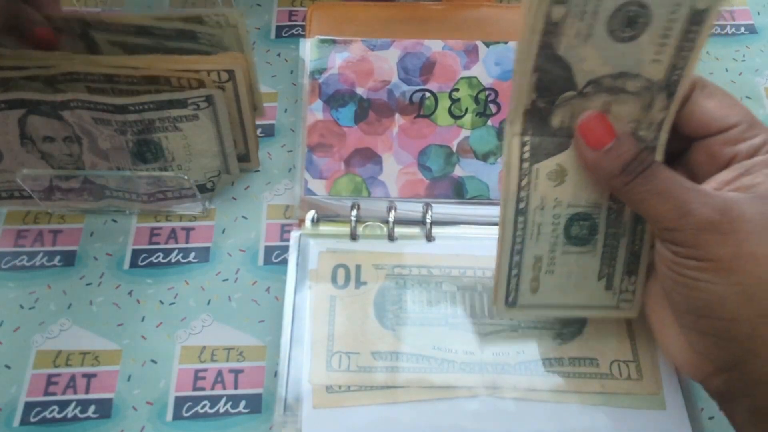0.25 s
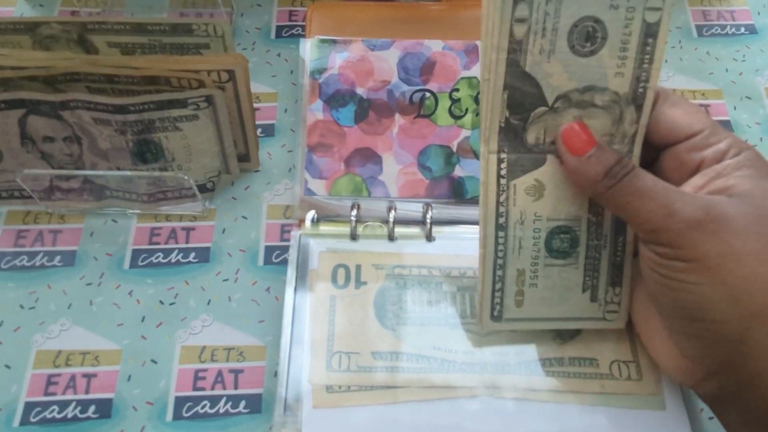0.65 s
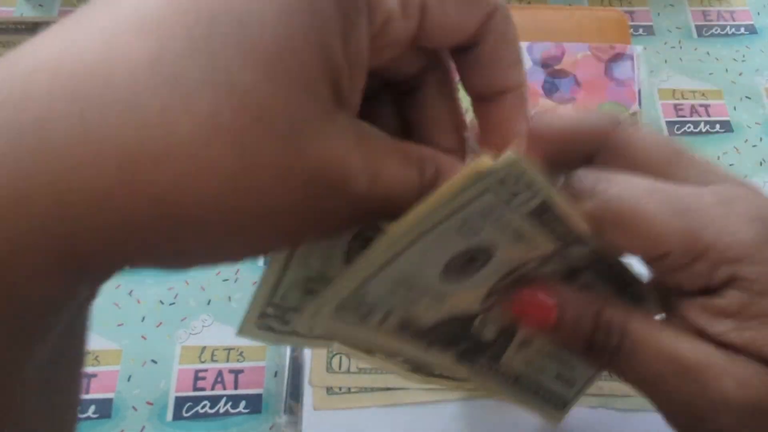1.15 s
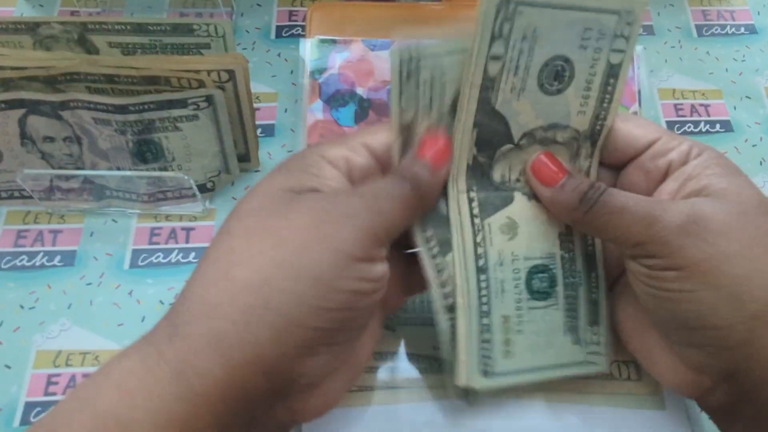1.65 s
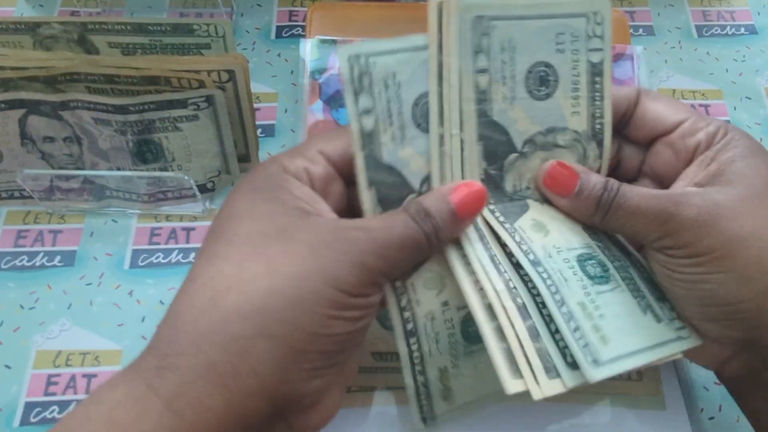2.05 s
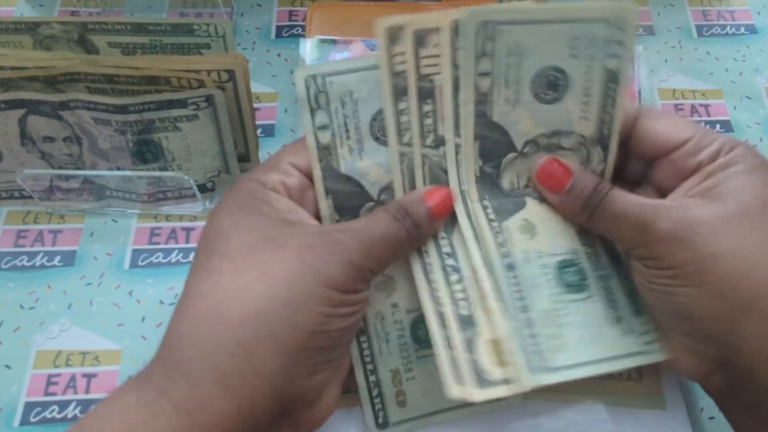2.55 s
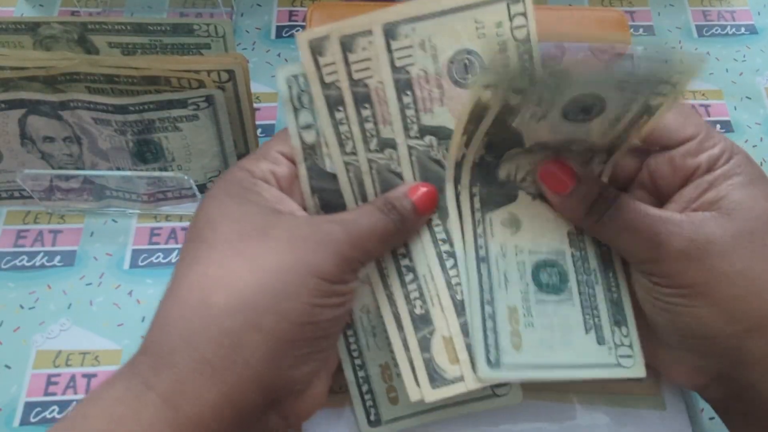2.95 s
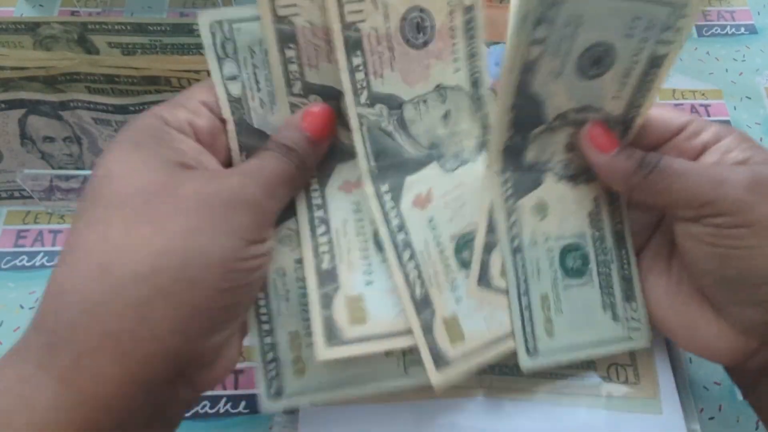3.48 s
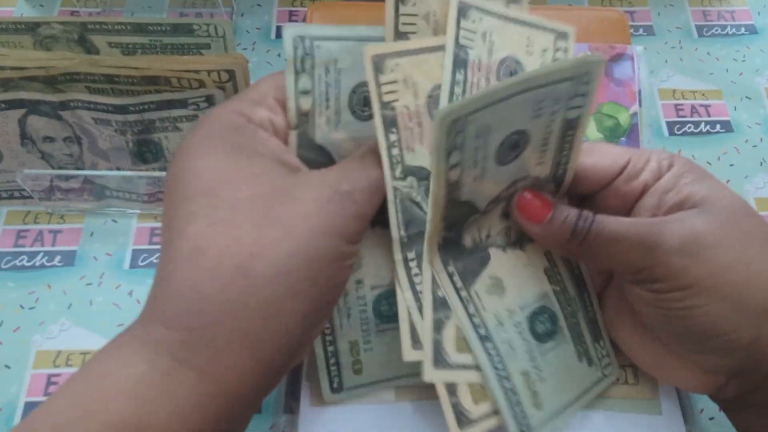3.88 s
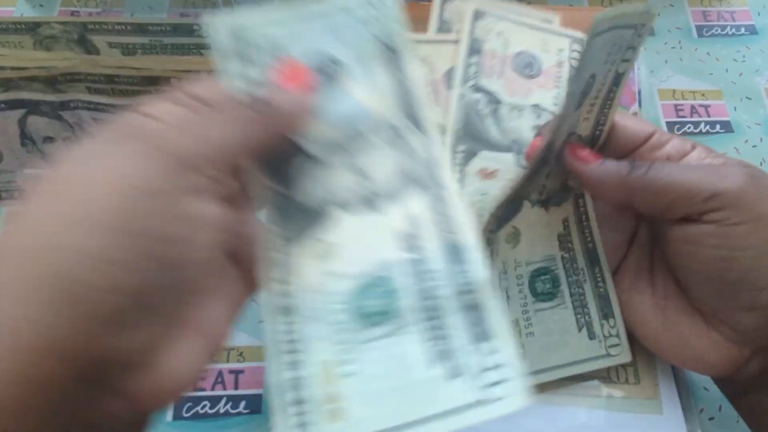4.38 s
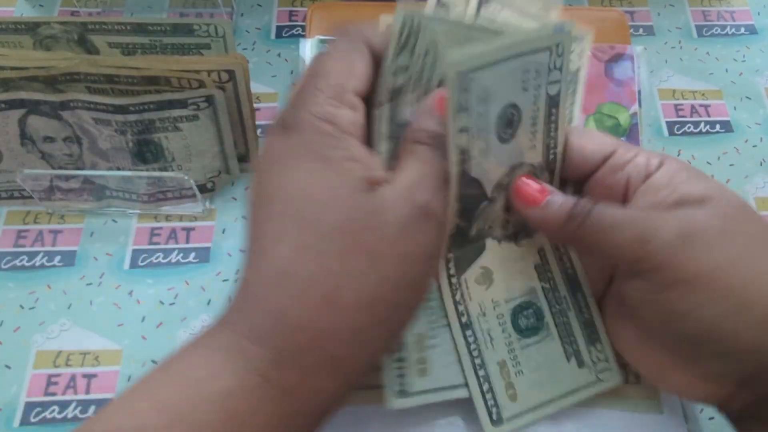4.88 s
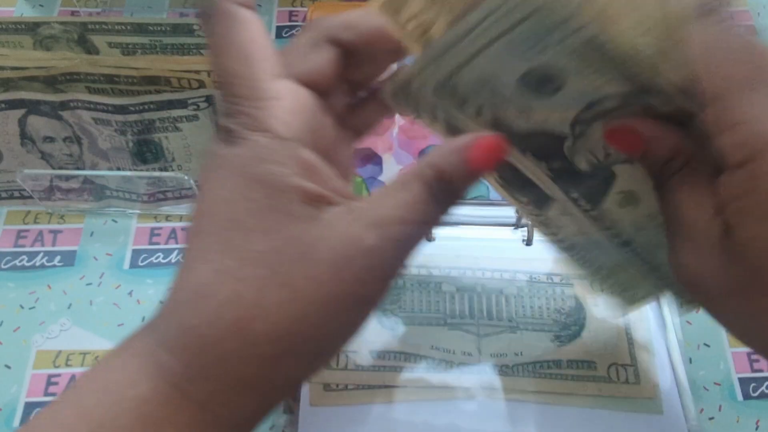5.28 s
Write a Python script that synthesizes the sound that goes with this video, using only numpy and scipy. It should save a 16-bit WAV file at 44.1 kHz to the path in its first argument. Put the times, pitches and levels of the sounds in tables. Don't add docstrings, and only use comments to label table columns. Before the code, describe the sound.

Dry banknotes rustle in short grainy strokes with small gaps. Light fingertip taps, buckling folds, tiny ticks and low puffs of air punctuate the hiss. The sharpest snaps come past the middle and late, as notes are flicked and pulled. Close, wide stereo pickup, slight desk reflections, little reverberation, and a low quiet room hum beneath faint hiss.

```python
import sys
import numpy as np
from scipy import signal
from scipy.fft import rfft, irfft, next_fast_len
from scipy.io import wavfile
from scipy.ndimage import uniform_filter1d, map_coordinates

SR = 44100
rng = np.random.default_rng(int(sys.argv[2]) if len(sys.argv) > 2 else 0)


def unload_audio(sound):
    columns = np.transpose(np.atleast_2d(sound))
    steps = np.round(np.clip(columns, -1, 1) * 32767)
    wavfile.write(sys.argv[1], SR, steps.astype(np.int16))


def how_loud(loudness_db):
    steps = np.asarray(loudness_db, float) / 20
    return 10 ** steps


N = 243917
CONTROL_STEP = 32

# freq_hz, level_db_per_hz
ROOM_TONE = [(35, -25), (60, 2), (219, -18.5), (289, -10.5), (633, -12), (938, -13), (1210, -22),
             (2200, -34), (15000, -46)]
# freq_hz, t60_s
ROOM_DECAY = [(100, 0.15), (1000, 0.31), (4000, 0.45), (12000, 0.33)]
# delay_ms, level_db
ECHOES = [(.9, -20.5), (1.7, -37.5), (2.9, -46), (4.6, -32), (7.3, -18.5), (11, -33)]
# time_s, left_lead_ms, left_over_right_db
HAND_PATH = [(0, .29, -0.5), (.5, .3, 1), (1.2, 0.16, 0), (1.8, 0.066, -1.5), (2.2, .09, -1),
             (2.8, 0.034, -1.1), (3.15, 0.069, -.5), (3.5, 0.081, -.5), (3.7, 0.11, .8), (4.1, 0.13, -.5),
             (4.7, 0.097, -0.1), (5.3, .0078, -1.4)]
# freq_hz, likeness_0_to_1
LIKENESS = [(100, 0.93), (600, 1), (1500, 0.51), (3000, 0.048), (7000, 0.049), (15000, 0.041)]
# freq_hz, width_hz, level_db
DESK_GAP = [(448, 32, 26.5), (1120, 480, 17.5), (1840, 170, 16.5), (2526, 450, 22), (3000, 130, -11)]

# start_s, peak_db, pitch_hz
PUFFS = [(0.879, -38, 450), (0.736, -35.5, 141), (0.877, -42.5, 314), (1.002, -36.5, 165),
         (1.199, -49, 243), (1.348, -44, 80), (1.488, -42, 173), (1.832, -45, 114), (2.026, -53, 119),
         (2.459, -34.5, 382), (5.261, -48, 54.6), (3.059, -47.5, 303), (3.141, -44, 130), (3.208, -49, 350),
         (3.345, -50.5, 135), (3.546, -60, 121), (3.704, -31, 108), (3.706, -31, 280), (3.983, -52, 101),
         (4.21, -52, 127), (4.764, -46.5, 79), (4.993, -47, 360), (4.995, -46.5, 132), (5.07, -48, 103),
         (5.242, -38.5, 163), (5.251, -43, 410), (5.417, -48, 154)]
# start_s, length_s, level_db, pitch_hz
POCKETS = [(0.332, 0.1, -66, 1920), (0.374, 0.029, -58, 3770), (0.439, 0.042, -61.5, 3370),
           (0.474, 0.077, -60, 2270), (0.607, 0.027, -70, 4970), (1.12, 0.021, -55.5, 5400),
           (1.336, .04, -55, 8000), (1.348, 0.035, -51.5, 6160), (2.342, 0.047, -57.5, 2170),
           (2.44, .03, -66, 8000), (3.671, .012, -44, 11500), (3.545, .02, -56, 6070),
           (3.703, 0.012, -35.5, 11900), (3.706, 0.018, -35, 4770), (3.866, 0.056, -55.5, 2220),
           (4.032, 0.083, -56, 6300), (4.351, 0.035, -59, 4300), (4.353, 0.036, -60, 3400),
           (4.709, 0.018, -40, 2500), (4.718, 0.017, -41, 2770), (4.721, 0.027, -45, 4320),
           (4.725, 0.023, -44, 8300), (4.728, 0.012, -50, 1710), (4.707, .03, -47, 6700),
           (5.083, 0.04, -62, 8200), (5.125, 0.065, -55, 5230)]
POCKET_WIDTH = 0.1
# start_s, length_s, level_db, tilt_db
SCRAPES = [(0.738, 0.007, -45.5, -8.5), (1.004, 0.035, -64, -3), (1.348, 0.024, -52, -5),
           (1.486, 0.0058, -38, 6), (1.496, 0.0074, -38.5, 2), (1.506, 0.019, -45, 6), (2.45, 0.02, -60, 8),
           (2.813, 0.003, -36.5, -1), (2.825, 0.01, -51, 9), (3.666, 0.017, -46.5, 7),
           (3.702, 0.01, -32.5, -2.5), (3.704, 0.016, -32, 3), (3.726, 0.025, -48, 0),
           (4.36, 0.041, -58.5, 1.5), (4.486, 0.014, -64, 10), (4.685, 0.014, -40, 4),
           (4.703, 0.022, -37, 5), (4.723, 0.022, -39.5, 7), (4.743, 0.022, -53, 2), (5.11, 0.04, -50, 9)]

# start_s, peak_db, crack_db, knock_db
TAPS = [(.066, -59.5, 3, 20), (.108, -67, 9, -4), (0.798, -48.5, -30, 7), (1.011, -49, -17, -10),
        (1.203, -58, -3, 7), (1.219, -53.5, 7.5, 12), (1.25, -45.5, 4, 21), (1.282, -40.5, -18, 6.5),
        (1.3, -49, -18, -4), (1.372, -46, -13, -4), (1.658, -56.5, -8, 11), (1.836, -46.5, -13, 12.5),
        (2.687, -54.5, -8, -4), (3.063, -67, -8, 0), (3.216, -44, -18, 10), (3.667, -44.5, -6, 3),
        (3.805, -52, -15, 2), (4.004, -50, -17, 2), (4.251, -47.5, -23, -14), (4.272, -55, -16, -4),
        (4.321, -48, -24, 3), (4.47, -53, -17, -3), (4.609, -61.5, -29, -11.5), (4.626, -55, -8, 3.5),
        (4.83, -55.5, 13.5, 16), (5.024, -52, -22, 15), (5.202, -46, -22, -12), (5.429, -47.5, -29, 6)]
TAP_HZ, TAP_T60_S = 457, 0.028
# start_s, peak_db, pitch_hz, knock_db
BUCKLES = [(0.121, -43, 3600, 4), (0.319, -43.5, 1290, -6), (.492, -54, 2280, -13),
           (0.651, -48.5, 1070, -7), (.690, -47, 880, 16), (.743, -37.5, 2600, 10.5),
           (0.885, -33, 880, 11.5), (.910, -35.5, 1140, 9), (.913, -31, 1130, 0), (1.004, -40, 1070, 13.5),
           (1.018, -32.5, 1340, -24), (1.558, -45, 1850, -6), (1.737, -40.5, 700, 10),
           (2.469, -30, 1130, 4), (2.578, -40.5, 1200, -25), (2.855, -43.5, 1140, -11),
           (2.909, -46, 1220, -9), (3.153, -41.5, 1060, 2), (3.479, -43, 1380, -6),
           (3.717, -27, 1210, -1.5), (4.025, -36, 1250, 7), (4.224, -33, 1270, 0), (4.683, -40, 3870, -4),
           (4.691, -23, 3760, -10), (4.71, -36, 2600, -14), (5.073, -30.5, 1320, -9),
           (5.312, -41.5, 1140, -18)]
BUCKLE_CRACK_DB, BUCKLE_T60_S = -21, 0.023
# start_s, peak_db, pitch_hz, crack_db
CRACKS = [(0.038, -46.5, 1670, -11), (0.225, -52, 1370, 6), (0.99, -50.5, 2390, 12.5), (1.13, -49, 1870, 0),
          (1.324, -39, 1750, -4), (1.358, -39, 1050, -7), (1.487, -35, 2580, -9), (1.498, -31, 2430, -1.5),
          (1.518, -44, 1990, -3), (1.941, -43, 1250, -8), (2.267, -50, 1450, 4), (2.82, -25, 1700, 0.5),
          (2.941, -36.5, 1770, -4), (3.094, -53, 910, -9.5), (3.191, -45, 1120, -12),
          (3.261, -45, 930, -17), (3.605, -53, 1010, -14), (3.704, -29.5, 1920, 13),
          (3.712, -35, 1970, -15), (4.223, -51, 2620, -18), (4.879, -52, 990, 10.5), (4.956, -52, 1200, 7),
          (5.117, -47, 1060, -10), (5.133, -51, 980, -2), (5.154, -44, 1340, -14), (5.178, -37.5, 1150, -6),
          (5.249, -31, 1570, -12), (5.298, -42.5, 1640, -18), (5.515, -48, 1450, -12)]
CRACK_KNOCK_DB, CRACK_T60_S = -8.5, 0.017
# start_s, peak_db, pitch_hz, crack_db
TICKS = [(0.682, -42, 2500, -16), (0.719, -41, 3000, -14), (0.736, -44, 4500, -11), (.786, -49, 2500, -13),
         (1.005, -35, 9900, -5), (1.113, -36.5, 3300, -17), (1.298, -33.5, 4370, -18),
         (1.317, -56, 1090, -14), (1.372, -49, 2200, -13), (1.522, -30.5, 5130, -7),
         (1.558, -34.5, 3000, -18), (1.658, -50, 2000, -8), (1.737, -32.5, 1550, -17),
         (1.76, -44, 1500, -8), (1.786, -35, 3400, -8), (1.948, -43, 2400, -5), (2.267, -30, 12000, -12),
         (2.273, -41, 9100, -1), (2.469, -27.5, 3950, -23), (2.577, -27, 11200, -22),
         (2.82, -31.5, 1010, -13), (3.077, -53, 2470, -2), (3.668, -40, 4500, -6), (3.708, -22, 4500, -8),
         (3.7075, -18.5, 6960, -12), (4.038, -48, 9000, 3), (4.223, -35, 3000, -25),
         (4.679, -52, 1510, -20), (4.955, -43, 2580, -16), (4.979, -44.5, 2500, -9),
         (5.039, -54, 1500, -10), (5.089, -56, 1500, -12), (5.118, -41, 1300, -15.5),
         (5.132, -39, 6000, -1), (5.247, -33, 2300, -11), (4.064, -42, 716, -20), (0.884, -34, 2190, -25),
         (0.744, -41, 1120, -15), (3.903, -41, 1310, -16), (1.503, -46, 1010, -16),
         (1.518, -44.5, 780, -18), (2.48, -44, 1250, -18), (2.497, -45, 1300, -18), (0.857, -55, 1190, -18),
         (3.721, -30, 1300, -16), (3.735, -44, 8500, -8),
         (1.846, -42, 1600, -16), (1.907, -50, 4500, -8), (2.082, -51, 2260, -20),
          (2.822, -30.5, 1180, -20), (3.107, -47, 1900, -14), (3.181, -45, 1800, -20),
          (3.217, -47, 1500, -14), (3.354, -55, 600, -20), (4.687, -39, 5000, -10), (4.769, -49, 640, -18),
          (5.025, -39, 2520, -14), (5.204, -42.5, 915, -18)]
TICK_KNOCK_DB, TICK_T60_S = -13.5, 0.0075

# freq_hz, level_db_per_hz
PUSH_SPECTRUM = [(15, -42.5), (25, -6), (48, 5.5), (109, 4.5), (205, -4), (263, -4), (330, -5.5),
                 (430, -40), (730, -120)]
# time_s, effort_db
ARM_EFFORT = [(0.0, -67.5), (0.14, -75.5), (0.44, -73.5), (0.86, -70), (1.89, -68), (2.08, -75),
              (2.53, -69.5), (2.69, -71), (2.93, -72.5), (3.09, -73), (3.57, -74), (3.8, -67), (3.9, -69),
              (4.21, -71.5), (4.47, -74), (5.11, -67), (5.34, -67), (5.53, -68)]
PUSH_DB, PUSH_FOLLOWS, PUSH_SMOOTH_S, PUSH_WANDER_DB = 3, 0.18, 0.092, 0.7

# freq_hz, level_db_per_hz
HISS_SPECTRUM = [(880, -38.5), (1500, -19), (1850, -1.5), (2120, -38), (2750, -6), (3710, -8.5), (7350, -8),
                 (8180, -7), (9720, -12), (11900, -7.5), (15000, -11)]
# freq_hz, level_db_per_hz
BODY_SPECTRUM = [(120, -59), (200, -5), (269, -4.5), (443, -8), (845, -4), (1220, -2.5), (3570, -12),
                 (5000, -2.5), (6500, -3.5), (11000, -120)]
# start_s, length_s, hiss_db,
# swell_db, body_over_hiss_db
RUB_STROKES = [(0, 0.0065, -60.5, -6, 2), (0.067, 0.13, -77, -6, 8.5), (0.222, 0.18, -59.5, 1, -0.5),
               (0.435, 0.05, -73, 2.5, 11), (0.513, 0.043, -58, 5.5, -4.5), (0.592, 0.02, -56, 4.5, -3.5),
               (0.65, 0.044, -66.5, -1.5, 8), (0.7, 0.055, -56.5, 8.5, 2.5), (0.841, 0.085, -60.5, 2.5, -1),
               (0.983, 0.018, -51, 0, -15), (1.007, 0.022, -52, -7, 2.5), (1.034, 0.041, -62, 1, 2),
               (1.125, 0.013, -60, -3, 4.5), (1.189, 0.044, -62, 0, 0.5), (1.251, 0.12, -51.5, 7, -3),
               (1.408, 0.068, -58, 9.5, -8), (1.533, 0.057, -60, -2.5, -2), (1.614, 0.071, -57.5, -2, -7.5),
               (1.707, 0.13, -52.5, 4, -2), (1.855, 0.038, -64, 6, -1), (1.947, 0.023, -56, -13.5, -1),
               (1.974, 0.13, -65.5, -7, -3.5), (2.119, 0.098, -60.5, -5.5, 1), (2.237, 0.1, -57.5, 1.5, 0),
               (2.383, 0.043, -55.5, 6, -1), (2.445, 0.032, -52.5, 2.5, -0.5), (2.505, 0.11, -60, 1.5, 1.5),
               (2.632, 0.25, -60.5, 5, -1.5),
               (2.835, 0.18, -63.5, -4, 1.5), (3.09, 0.038, -53, 2.5, -1.5), (3.155, 0.046, -55.5, 3, 1),
           (3.215, 0.023, -50.5, 0, -6), (3.25, 0.018, -61, 4, 4), (3.28, 0.21, -58.5, 2.5, -1.5),
           (3.48, 0.082, -56, 11.5, -3.5), (3.61, 0.13, -51, 9.5, 0), (3.74, .11, -57.5, -1, -2),
           (3.868, 0.045, -54.5, 2, 3), (3.935, 0.064, -58, 0, 2.5), (4.02, 0.16, -54, 1.5, -1),
           (4.21, 0.087, -70.5, 6, 1.5), (4.305, 0.017, -58.5, 5, -6), (4.345, 0.052, -59, -2, -5.5),
           (4.415, 0.033, -71.5, -9, 4.5), (4.46, 0.039, -68, 3.5, 8.5), (4.759, 0.084, -60, 0, -0.5),
           (4.873, 0.16, -56, 7, -0.5), (5.05, 0.081, -50.5, 7.5, 0), (5.145, 0.059, -52, -5, -7),
           (5.21, 0.033, -55.5, 10, 1.5), (5.28, 0.13, -62, 10.5, 3), (5.44, 0.18, -72.5, -9, 9)]
START_DB_PER_S, STOP_DB_PER_S, BODY_STOP_DB_PER_S = 697, 439, 258
SETTLE_DB, SETTLE_DB_PER_S = -33, 62
REST_HISS_DB, REST_BODY_DB = -85, -73.5


def unit(x):
    return x / np.sqrt(np.mean(x ** 2) + 1e-20)


def along(points, hz):
    f, v = np.transpose(points)
    return np.interp(np.log(hz + 1), np.log(f + 1), v)


def curves(rows):
    s, *cols = np.transpose(rows)
    return [np.interp(np.arange(N) / SR, s, c) for c in cols]


def smooth(control):
    return np.interp(np.arange(N), np.arange(len(control)) * CONTROL_STEP, control)


def wobble(rate_hz):
    knots = rng.standard_normal(int(N * rate_hz / SR) + 4)
    fine = map_coordinates(knots, [np.arange(len(knots) * 8) / 8])
    return np.interp(np.arange(N) * rate_hz / SR, np.arange(len(fine)) / 8, fine)


def filtered(x, response):
    m = next_fast_len(x.shape[-1] + 2048, True)
    spectrum = rfft(x, m) * response(np.fft.rfftfreq(m, 1 / SR))
    return irfft(spectrum, m)[..., :x.shape[-1]]


def resonance(f, hz, width_hz):
    return 1j * f * width_hz / (hz * hz - f * f + 1j * f * width_hz)


def gap(f, open_db):
    ringing = sum(how_loud(db) * np.abs(resonance(f, hz, width_hz)) for hz, width_hz, db in DESK_GAP)
    return how_loud(open_db) + ringing


def spread(shared, own):
    def turn(hz):
        return np.arccos(np.clip(along(LIKENESS, hz), 0, 1)) / 2

    pair = np.array([shared, own])
    mid, side = filtered(pair, lambda hz: np.array([np.cos(turn(hz)), np.sin(turn(hz))]))
    return np.array([mid + side, mid - side])


def friction(grain_db, clump_db, patch_db):
    z = signal.stft(rng.standard_normal((2, N)), nperseg=512)[2]
    field = uniform_filter1d(rng.standard_normal(z.shape[1:]), size=7, axis=0)
    field = uniform_filter1d(field, size=9, axis=1)
    noise = signal.istft(z * how_loud(patch_db * unit(field)), nperseg=512)[1][:, :N]
    size_db = grain_db * wobble(900) + clump_db * (wobble(120) + wobble(35))
    return spread(*(noise * how_loud(size_db)))


def crackle(rate_hz, spread_db):
    hit = rng.random(N) < rate_hz / SR
    size = np.minimum(rng.exponential(size=N), 2.5)
    return spread(*(hit * how_loud(spread_db * size) * rng.standard_normal((2, N))))


def room_tone():
    return how_loud(-72.5) * unit(filtered(rng.standard_normal((2, N)), lambda f: how_loud(along(ROOM_TONE, f))))


def room(x):
    hz, t, z = signal.stft(rng.standard_normal((2, SR // 3)), SR, nperseg=256)
    decay = how_loud(-60 * t / along(ROOM_DECAY, hz)[:, None])
    tail = signal.istft(z * decay, SR, nperseg=256)[1]
    delayed = np.pad(x, ((0, 0), (220, 0)))
    return signal.fftconvolve(delayed, tail / np.linalg.norm(tail[0]), axes=1)[:, :N]


def nearby(x):
    skew = np.array([[1.07], [.93]])

    def returns(f):
        return 1 + sum(how_loud(db) * np.exp(-2j * np.pi * f * ms * skew / 1000) for ms, db in ECHOES)

    return filtered(x, returns)


def placed(x):
    lead_ms, pan_db = curves(HAND_PATH)
    lead = lead_ms * SR / 2000
    n = np.arange(N)
    left = map_coordinates(x[0], [n + lead], order=3)
    right = map_coordinates(x[1], [n - lead], order=3)
    return np.array([left * how_loud(pan_db / 2), right * how_loud(-pan_db / 2)])


def puffs():
    out, t = np.zeros(N + SR), np.arange(SR // 5) / SR
    for s, db, hz in PUFFS:
        swell = rng.standard_normal(len(t)) * t * how_loud(-60 * t / 0.056)
        push = filtered(swell, lambda f: resonance(f, hz, 1.0 * hz) ** 2)
        out[round(s * SR):][:len(t)] += how_loud(db - 6.5) * push / np.abs(push).max()
    return out[:N]


def hand_push():
    body_db = strokes()[1]
    thump = filtered(friction(grain_db=.1, clump_db=.9, patch_db=1.2), lambda f: how_loud(along(PUSH_SPECTRUM, f)))
    motion_db = uniform_filter1d(body_db, size=round(PUSH_SMOOTH_S * SR))
    follow_db = PUSH_FOLLOWS * (motion_db - motion_db.mean())
    push_db = PUSH_DB + curves(ARM_EFFORT)[0] + follow_db + PUSH_WANDER_DB * wobble(9.9)
    return how_loud(push_db) * unit(thump)


def pockets():
    out, t = np.zeros((2, N + SR)), np.arange(SR // 8) / SR
    for s, length_s, db, hz in POCKETS:
        noise = rng.laplace(size=(2, len(t)))
        band = unit(filtered(noise, lambda f: resonance(f, hz, POCKET_WIDTH * hz) ** 2))
        swell = np.sin(np.pi * np.clip(t / length_s, 0, 1))
        out[:, round(s * SR):][:, :len(t)] += how_loud(db) * band * swell
    return out[:, :N]


def scrapes():
    t = np.arange(0, N, CONTROL_STEP) / SR
    low, high = np.zeros((2, len(t)))
    for s, length_s, db, tilt_db in SCRAPES:
        attack = np.clip((t - s) / 0.0054, 0, 1)
        shape = attack * how_loud(-60 * np.clip(t - s - length_s, 0, 1) / 0.015)
        low += how_loud(db - tilt_db) * shape
        high += how_loud(db - 6.0 + tilt_db) * shape
    body = filtered(friction(grain_db=2.0, clump_db=1.24, patch_db=-2.0),
                    lambda f: resonance(f, 1970, 4700) * gap(f, open_db=-22))
    hiss = filtered(friction(grain_db=-2.0, clump_db=1.6, patch_db=1.8), lambda f: how_loud(along(HISS_SPECTRUM, f)))
    return smooth(low) * unit(body) + smooth(high) * unit(hiss)


def contacts():
    taps = [(s, db, TAP_HZ, crack, knock, TAP_T60_S) for s, db, crack, knock in TAPS]
    buckles = [(s, db, hz, BUCKLE_CRACK_DB, knock, BUCKLE_T60_S) for s, db, hz, knock in BUCKLES]
    cracks = [(s, db, hz, crack, CRACK_KNOCK_DB, CRACK_T60_S) for s, db, hz, crack in CRACKS]
    ticks = [(s, db, hz, crack, TICK_KNOCK_DB, TICK_T60_S) for s, db, hz, crack in TICKS]
    return taps + buckles + cracks + ticks


def snaps():
    out, t = np.zeros((2, N + SR)), np.arange(SR // 24) / SR
    s, db, hz, crack_db, knock_db, t60_s = np.transpose(contacts())[:, :, None, None]
    noise = rng.laplace(size=(len(s), 3, 2, len(t)))
    noise[..., :110] *= 0.3
    noise[:, :, 0, 110] += 24
    burst = how_loud(-60 * t / np.clip(t60_s, .004, .3)) * (1 - np.exp(-t / 0.0036))

    def knock_response(f):
        broad = resonance(f, 1550, 2550) ** 3 * (1 + 0.17 * resonance(f, 1060, 280))
        return broad + 0.9 * resonance(f, 462, 160)

    fold = filtered(noise[:, 0] * burst, lambda f: resonance(f, hz, 0.5 * hz) ** 2)
    knock = filtered(noise[:, 1] * burst, knock_response)
    crack = filtered(noise[:, 2] * burst ** 2, lambda f: resonance(f, 6460, 5800) ** 2)
    sounds = 0
    for x, level_db in ((fold, 1.5), (knock, knock_db), (crack, crack_db + 12.0)):
        sounds = sounds + how_loud(db + level_db) * x / np.abs(x).max(axis=(1, 2), keepdims=True)
    starts = np.round(s.ravel() * SR).astype(int) - 74
    for start, sound in zip(starts, sounds):
        out[:, start:start + len(t)] += sound
    return spread(out[0, :N], 1.02 * out[1, :N])


def strokes():
    t = np.arange(0, N, CONTROL_STEP) / SR
    s, length_s, db, swell_db, body_db = np.transpose(RUB_STROKES)[:, :, None]
    swell = swell_db * (np.clip((t - s) / length_s, 0, 1) - .5)
    held_db = db + swell - START_DB_PER_S * np.clip(s - t, 0, 1)
    after_s = np.clip(t - s - length_s, 0, 9)
    creep = how_loud(held_db + SETTLE_DB - SETTLE_DB_PER_S * after_s) ** 2
    hiss = how_loud(held_db - STOP_DB_PER_S * after_s) ** 2 + creep
    body = how_loud(held_db + body_db - BODY_STOP_DB_PER_S * after_s) ** 2 + creep
    rests = ((hiss, REST_HISS_DB), (body, REST_BODY_DB))
    return [smooth(10 * np.log10(x.sum(axis=0) + how_loud(rest_db) ** 2)) for x, rest_db in rests]


def slide():
    hiss_db, body_db = strokes()

    def hiss_response(f):
        return how_loud(along(HISS_SPECTRUM, f))

    def body_response(f):
        return how_loud(along(BODY_SPECTRUM, f)) * gap(f, open_db=-19)

    def pop_response(f):
        return resonance(f, 1110, 390) + 0.39 * resonance(f, 1860, 620) + 1.9 * resonance(f, 457, 99)

    hiss = filtered(friction(grain_db=-0.5, clump_db=1.12, patch_db=2.5), hiss_response)
    fizz = filtered(crackle(rate_hz=500, spread_db=-0.5), hiss_response)
    body = filtered(friction(grain_db=0.5, clump_db=2.0, patch_db=2.0), body_response)
    pops = filtered(crackle(rate_hz=160, spread_db=1.0), pop_response)
    rub = unit(hiss) + how_loud(-6) * unit(fizz)
    bulk = unit(body) + how_loud(-10.0) * unit(pops)
    return how_loud(hiss_db + 1.0) * rub + how_loud(body_db) * bulk


def scene():
    sharp = snaps() + scrapes() + puffs() + pockets()
    steady = slide() + hand_push()
    return nearby(placed(steady + sharp)) + how_loud(-17.0) * room(sharp) + room_tone()


def band_limit(x):
    return signal.sosfilt(signal.butter(12, 16450, fs=SR, output="sos"), x)


def record(dry):
    def band(f):
        top = how_loud(-40) + 1 / (1 + (f / 15250) ** 120)
        return top / (1 + (38 / (f + 1)) ** 6)

    return band_limit(filtered(dry, band))


dry = scene()
out = record(dry)
unload_audio(out)
```